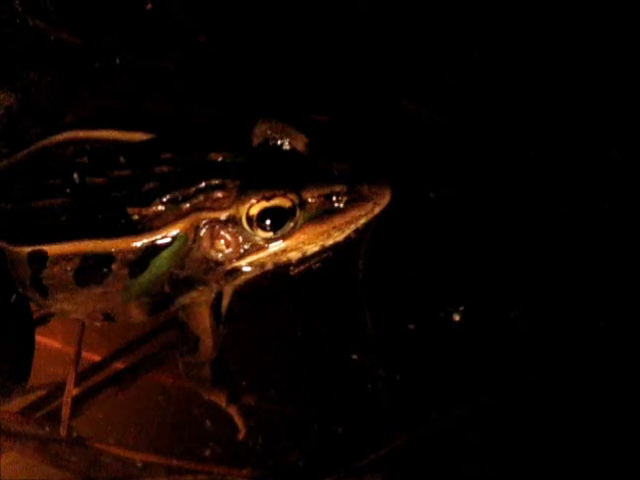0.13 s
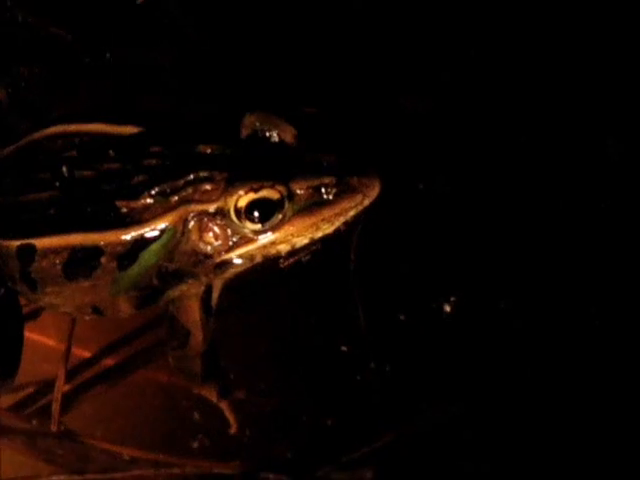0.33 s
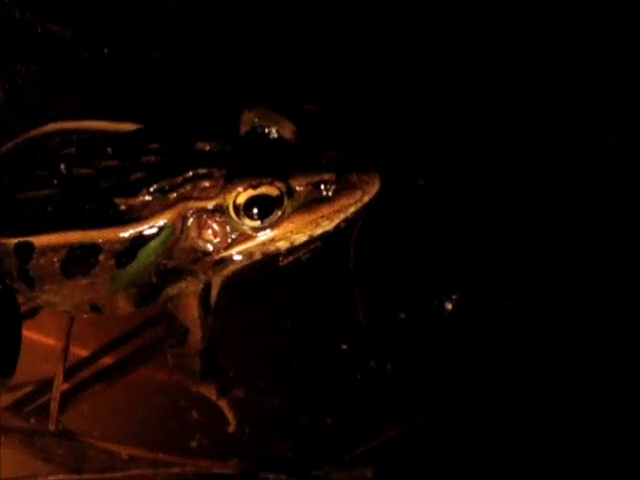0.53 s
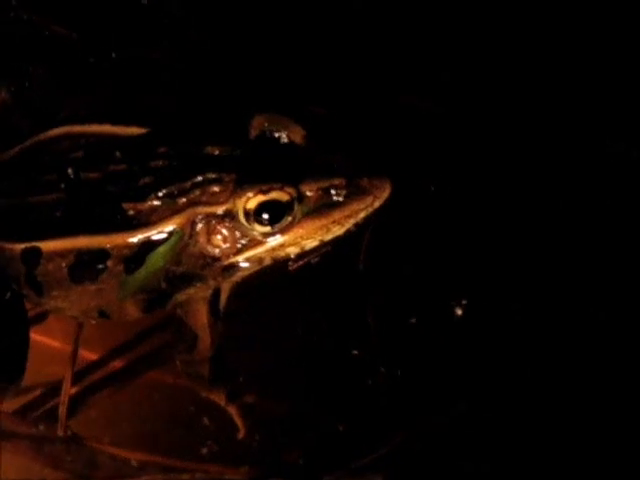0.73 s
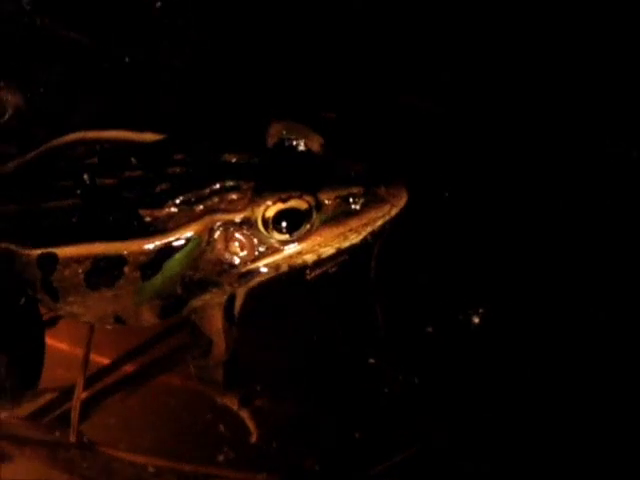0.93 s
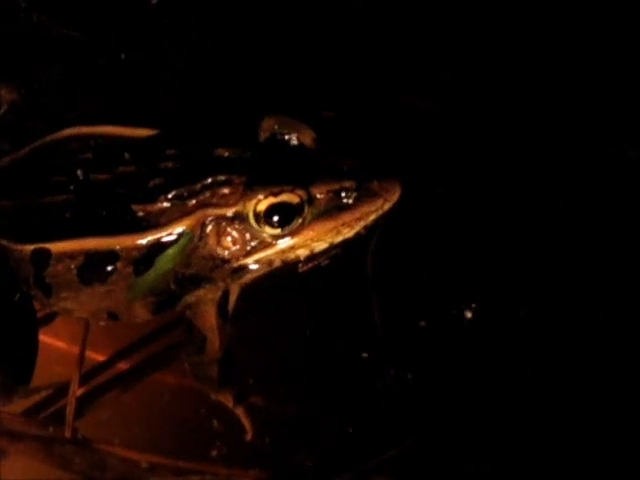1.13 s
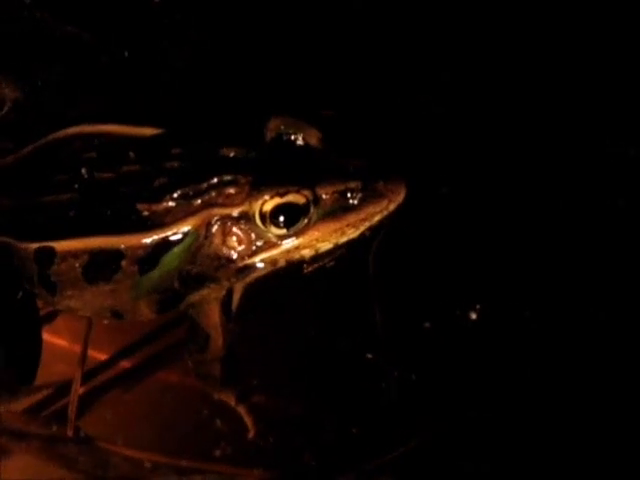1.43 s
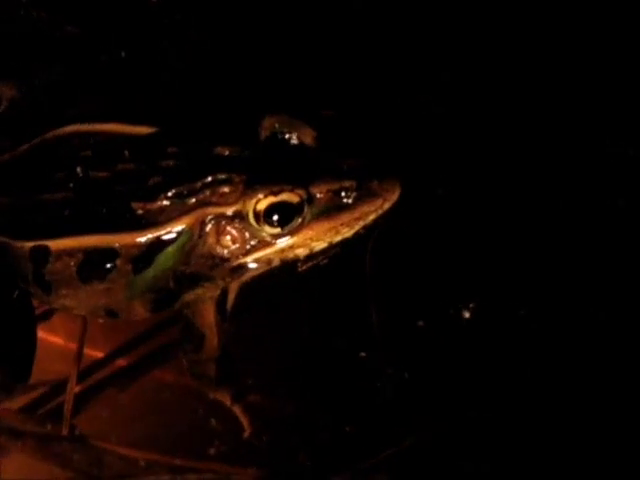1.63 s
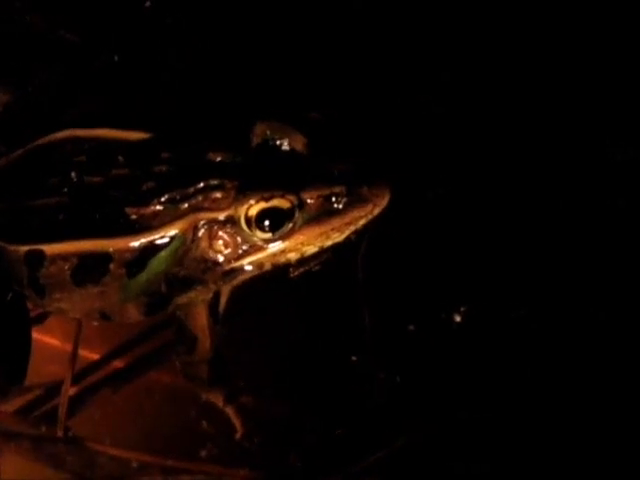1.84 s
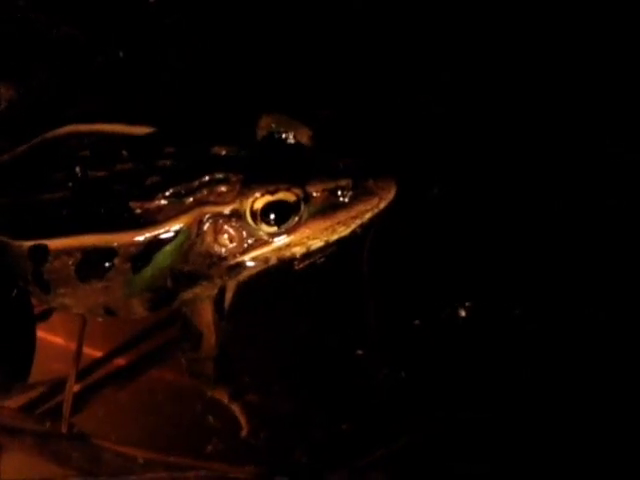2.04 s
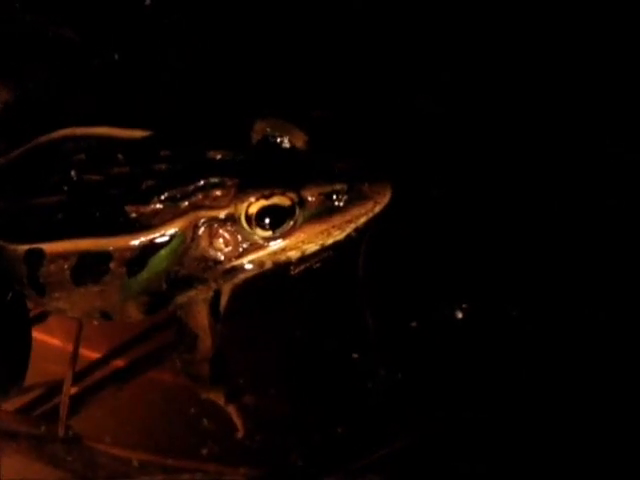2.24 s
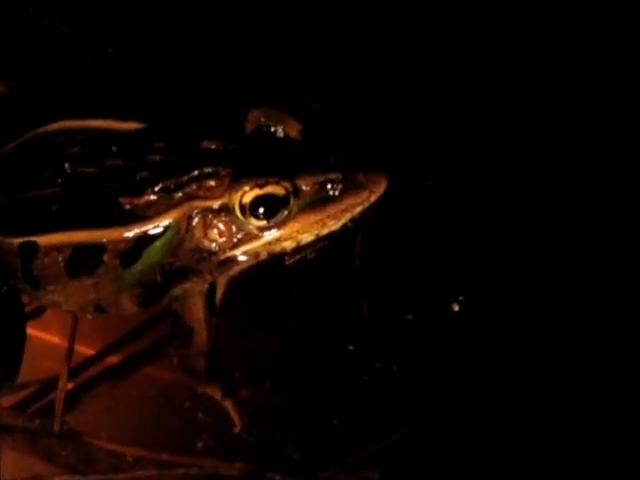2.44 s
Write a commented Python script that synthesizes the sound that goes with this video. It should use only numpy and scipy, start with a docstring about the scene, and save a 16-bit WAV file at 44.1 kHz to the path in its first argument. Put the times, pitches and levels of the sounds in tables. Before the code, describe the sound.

Frogs trill close by in fast, pulsing, overlapping trains at a night pond, with steady clucks, bursts of high ticks and short falling whistles; a loud pop and abrupt cut-in open it, distant chorus behind.

```python
"""Several frogs trill near 2 kHz at night by a pond, about fifty pulses a second, drifting in and out of step.
Lower trills, clucks near 3 kHz, and ticks and whistles near 5 kHz join in: all are short tones that swell and
die away. A far chorus of similar tones and a night hiss of shaped noise lie behind them.
A loud pop comes first; shortly after it the narrow-band, nearly mono scene cuts in abruptly with a click."""
import sys
import numpy as np
from scipy import signal
from scipy.fft import rfft, irfft, next_fast_len
from scipy.io import wavfile
from scipy.ndimage import uniform_filter1d, map_coordinates

SR = 44100
rng = np.random.default_rng(int(sys.argv[2]) if len(sys.argv) > 2 else 0)


def to_wav(s):
    """Save 16-bit WAV."""
    ch = np.atleast_2d(s).T  # columns
    pcm = np.round(np.clip(ch, -1, 1) * 32767)  # PCM
    wavfile.write(sys.argv[1], SR, pcm.astype(np.int16))


N = 113337
TIME_S = np.arange(N) / SR

BEAT_S = .02  # steady beat that each trill lags behind
PULSE_RISE_S, PULSE_T60_S, PULSE_FALL_HZ_PER_S = .005, .022, 9000
PULSE_SCATTER_S, PULSE_SCATTER_DB, PULSE_SCATTER_HZ = .0004, 1.2, 20
WHISTLE_FALL_HZ_PER_S = 7500  # whistles and far peeps


def amp(db):
    """Turn decibels into a plain multiplier."""
    return 10 ** (np.asarray(db) / 20)


def unit(x):
    """Scale a sound to an average (RMS) strength of one."""
    return x / np.sqrt(np.mean(x ** 2) + 1e-20)


def level_curve(table):
    """Join (t/s, level/dB) points with straight lines in dB, then turn them into multipliers."""
    return amp(np.interp(TIME_S, *np.transpose(table)))


def wobble(rate):
    """A smooth random curve through `rate` random points a second."""
    points = rng.standard_normal(int(N * rate / SR) + 4)
    return map_coordinates(points, [np.arange(N) * rate / SR])


def filtered(x, response):
    """Make each frequency of x stronger or weaker, as the response says."""
    size = next_fast_len(N + SR // 4)
    hz = np.fft.rfftfreq(size, 1 / SR)
    return irfft(rfft(x, size) * response(hz), size)[..., :N]


def notes(s, db, hz, envelope, fall_hz_per_s):
    """Short tones starting at times s, each gliding at a steady rate (0 holds the pitch) under its envelope."""
    t = np.arange(SR // 20) / SR
    s, db, hz = [np.asarray(v, float)[:, None] for v in (s, db, hz)]
    cycles = hz * t - fall_hz_per_s * t * t / 2 + rng.random(s.shape)
    wave = amp(db) * envelope(t) * np.sin(2 * np.pi * cycles)
    where = np.clip(np.round(s * SR).astype(int) + np.arange(len(t)), 0, N)
    return np.bincount(where.ravel(), wave.ravel(), N + 1)[:N]


def swell(rise_s, t60_s):
    """A smooth rise, then a rounded exponential fall."""
    def envelope(t):
        rise = np.sin(np.pi / 2 * t / rise_s) ** 3
        fall = 1 / np.cosh(np.log(1000) * np.abs(t - rise_s) / t60_s)
        return np.where(t < rise_s, rise, fall)
    return envelope


def pulses(s, db, hz, fall_hz_per_s):
    """Trill pulses peaking around times s, each a little different in time, level and pitch."""
    r = rng.standard_normal((len(s), 3))
    # start high enough to glide onto the wanted pitch at the peak
    start_hz = hz + PULSE_SCATTER_HZ * r[:, 0] + fall_hz_per_s * PULSE_RISE_S
    start_s = s - PULSE_RISE_S + PULSE_SCATTER_S * r[:, 1]
    level_db = db + PULSE_SCATTER_DB * r[:, 2]
    return notes(start_s, level_db, start_hz, swell(PULSE_RISE_S, PULSE_T60_S), fall_hz_per_s)


def trills(frogs, fall_hz_per_s):
    """Each frog pulses whenever its lagging beat comes round, so changing lags shift it out of step."""
    out = 0
    for frog in frogs:
        s, lag_ms, hz, db = np.transpose(frog)
        beats = (s - lag_ms / 1000) / BEAT_S
        whole_beats = np.arange(np.ceil(beats[0]), beats[-1])
        times = np.interp(whole_beats, beats, s)
        out = out + pulses(times, np.interp(times, s, db), np.interp(times, s, hz), fall_hz_per_s)
    return out


def knocks(events, ratios, parts, fall_hz_per_s, rasp_db_per_hz=0):
    """Each call is a stack of short falling tones at set ratios of its pitch, each a little scattered."""
    s, db, hz = np.transpose(events)
    rasp_db = rasp_db_per_hz * (hz - 3200)  # no change at 3200 Hz
    out = 0
    for ratio, (delay_s, part_db, rise_s, t60_s, spread_hz) in zip(ratios, parts):
        is_outer = abs(ratio - 1) > .1
        level_db = db + part_db + rasp_db * is_outer + rng.normal(0, 1.2, len(s))
        pitch_hz = hz * ratio + spread_hz * rng.standard_normal(len(s))
        out = out + notes(s + delay_s, level_db, pitch_hz, swell(rise_s, t60_s), fall_hz_per_s)
    return out


def scattered(per_s, hz, spread_hz, db, spread_db, count=120):
    """Random (t/s, level/dB, f/Hz) events at a loosely regular rate."""
    r = rng.standard_normal((count, 3))
    s = (np.arange(count) + .3 * r[:, 0]) / per_s
    return np.transpose([s, db + spread_db * r[:, 1], hz + spread_hz * r[:, 2]])


POP_S, POP_HZ, POP_LENGTH_S = .05945, 5520, .000305
POP_THUMP_DB, POP_RING_DB = (-15.5, -13), (-5, -15)  # left, right
RATTLE_DB, RATTLE_T60_S, RATTLE_S = -32, .06, .023


def pop():
    """A thump with a very short bright burst, mostly on the left, and a faint noisy rattle from its start."""
    t = np.clip(TIME_S - POP_S, 0, 1)
    window = np.sqrt(np.abs(np.sin(np.pi * np.clip(t / POP_LENGTH_S, 0, 1)))) * (t < POP_LENGTH_S)
    ring = -np.cos(2 * np.pi * POP_HZ * (t - POP_LENGTH_S * .62))
    burst = amp(POP_THUMP_DB)[:, None] + amp(POP_RING_DB)[:, None] * ring
    fading = amp(RATTLE_DB - 60 * t / RATTLE_T60_S) * (t > 0) * (t < RATTLE_S)
    return window * burst + fading * rng.standard_normal(N)


# close trilling frogs, one list per frog: t/s, lag behind the steady beat/ms, f/Hz, level/dB
MAIN_TRILLS = [
    [(.14, 9.74, 2123, -13), (.3, 9.46, 2113, -10.5), (.45, 6.57, 2092, -14.5), (.55, 4.78, 2104, -17.5),
     (.66, 5.07, 2098, -11.5), (.85, 5.8, 2095, -13), (1.0, 7.48, 2090, -13), (1.2, 8.94, 2086, -10.5),
     (1.33, 9.84, 2087, -12.5), (1.45, 10.93, 2087, -13), (1.7, 13, 2078, -11.5), (1.9, 16.7, 2077, -14.5),
     (2.05, 20.4, 2094, -12.5), (2.13, 23.6, 2050, -12.5), (2.22, 34, 2082, -15.5), (2.27, 39.3, 2060, -16)],
    [(.14, 3, 1910, -17), (.25, 13.1, 1815, -23.5), (.33, 22.6, 1848, -17.5), (.42, 34.3, 1865, -29),
     (.52, 43, 1843, -24)],
    [(.14, 0.5, 2019, -16), (.3, 1, 1966, -18.5), (.5, 2, 1962, -17.5)],
    [(.68, 16.4, 2020, -29), (.88, 18, 2027, -15.5), (1.0, 19.8, 2040, -12), (1.2, 21, 2040, -22.5),
     (1.3, 22.3, 1950, -21.5)],
    [(1.5, -0.5, 2030, -24), (1.62, 3.5, 2030, -18), (1.72, 2.5, 2020, -17), (1.92, 1.5, 1992, -27),
     (2.0, 2.5, 1977, -17.5)],
    [(2.2, -1, 2040, -18), (2.35, 1, 2040, -14.5), (2.45, 5, 2030, -12.5), (2.58, 7.5, 2030, -11.5)],
]


def main_trills():
    """The close frogs near 2 kHz: trains of pulses that each glide down in pitch."""
    return trills(MAIN_TRILLS, PULSE_FALL_HZ_PER_S)


# how loud the far trills are together: t/s, level/dB
FAR_TRILL_LEVEL = [(.14, -23), (.45, -27), (.55, -37), (.75, -27.5), (1.0, -22), (1.35, -35), (1.7, -18.5),
                   (2.0, -26), (2.3, -23), (2.57, -31.5)]


def far_trills(count=8):
    """Several frogs out of step, each a pulse train with its own rate, pitch and random swells."""
    out = 0
    for rate, phase, pitch in rng.random((count, 3)):
        per_s = 45 + 8 * rate
        times = (np.arange(140) + phase) / per_s
        hz = 2050 + 120 * (2 * pitch - 1)
        train = pulses(times, 0 * times, hz + 0 * times, PULSE_FALL_HZ_PER_S)
        swells = amp(3.5 * wobble(3))  # dB, three random points a second
        out = out + swells * train
    return unit(out) * level_curve(FAR_TRILL_LEVEL)


def far_low():
    """A ragged skirt of lower voices under the main trill: falling pulses at loosely regular times."""
    s, db, hz = np.transpose(scattered(per_s=170, hz=1680, spread_hz=140, db=-36, spread_db=3, count=500))
    return pulses(s, db, hz, PULSE_FALL_HZ_PER_S)


# tone colour of the night noise, only relative levels matter: f/Hz, level per Hz/dB
NIGHT_COLOUR = [(20, -32), (60, -34), (870, -37.5), (1350, -31.5), (1700, -25), (2050, -13), (2300, -22),
                (2500, -32), (3070, -30), (3900, -37), (4400, -36.5), (5100, -31.5), (5450, -43.5),
                (5900, -62.5), (6600, -85)]
# how loud the night noise is: t/s, level/dB
NIGHT_LEVEL = [(.14, -37), (.4, -37), (.55, -39), (.75, -36), (1.3, -37), (1.7, -35), (2.1, -36),
               (2.57, -33)]
PATCHY_DB = 3


def night():
    """Blurred distant callers and hiss: noise made uneven in time and pitch, then coloured."""
    grid = signal.stft(rng.standard_normal(N), nperseg=256)[2]
    patches = uniform_filter1d(rng.standard_normal(grid.shape), 3, 0)  # smooth across pitch
    patches = uniform_filter1d(patches, 5, 1)  # smooth across time
    noise = signal.istft(grid * amp(PATCHY_DB * unit(patches)), nperseg=256)[1][:N]
    f, db = np.transpose(NIGHT_COLOUR)
    coloured = filtered(noise, lambda hz: amp(np.interp(np.log(hz + 1), np.log(f), db)))
    return level_curve(NIGHT_LEVEL) * unit(coloured)


# near clucks: t/s, level/dB, f/Hz
NEAR_CLUCKS = [(0.1693, -23.5, 3030), (0.2361, -20, 3084), (0.308, -20.5, 3170), (0.3858, -20.5, 3180),
               (0.4699, -18.5, 3310), (0.5615, -27, 3380), (0.6417, -26, 3376), (0.7256, -35, 2800),
               (0.7731, -24.5, 2750), (0.832, -24.5, 2914), (0.899, -19, 2950), (0.9726, -21, 3000),
               (1.0513, -20, 3005), (1.1378, -19, 3050), (1.2, -27, 3010), (1.228, -22, 3020),
               (1.2496, -28, 3040), (1.3072, -29, 2710), (1.3217, -22, 3110), (1.3671, -21.5, 3020),
               (1.4072, -27, 3200), (1.4302, -23, 3130), (1.497, -24.5, 3040), (1.5658, -20, 3350),
               (1.6357, -24, 3330), (1.7112, -27.5, 3520), (1.7801, -28.5, 3376), (1.871, -28, 3050),
               (1.922, -30.5, 3030), (1.9802, -26.5, 3080), (2.0462, -20.5, 2990), (2.1174, -19.5, 3347),
               (2.1961, -15.5, 3270), (2.2795, -15, 3287), (2.309, -33, 3287), (2.364, -20, 3346),
               (2.4447, -18.5, 3374)]
# pitch of each part of a cluck, as a multiple of the cluck's f
CLUCK_RATIOS = [1.015, .91, 1.13, .82, 1.25, 1.0]
# the same parts: delay t/s, level/dB, rise t/s, 60 dB fall t/s, pitch scatter f/Hz
CLUCK_PARTS = [(0, -2.5, .0022, .022, 15), (.001, -9, .002, .018, 50), (0, -10, .0012, .013, 90),
               (0, -14, .0012, .013, 90), (0, -22, .0007, .007, 250), (.0105, -13, 0.0034, .018, 30)]


def clucks():
    """Near and far clucks share one stack of falling tones; higher clucks have stronger outer tones."""
    far = scattered(per_s=22, hz=3050, spread_hz=200, db=-40, spread_db=3)
    return sum(knocks(events, CLUCK_RATIOS, CLUCK_PARTS, fall_hz_per_s=8000, rasp_db_per_hz=.022)
               for events in (NEAR_CLUCKS, far))


# the single part of a far peep: delay t/s, level/dB, rise t/s, 60 dB fall t/s, pitch scatter f/Hz
PEEP_PARTS = [(0, -.5, .004, .04, 20)]


def far_peeps():
    """Soft falling tones near 5 kHz, rising too gently to click."""
    peeps = scattered(per_s=38, hz=5170, spread_hz=90, db=-44, spread_db=2.5)
    return knocks(peeps, [1], PEEP_PARTS, WHISTLE_FALL_HZ_PER_S)


# near ticks: t/s, level/dB, f/Hz
TICKS = [(0.2666, -33, 4850), (0.3002, -33.5, 4790), (0.3303, -36.5, 4670), (0.3572, -33.5, 4800),
         (0.493, -16.5, 4690), (0.5157, -29.5, 5230), (0.5257, -16.5, 4870), (0.5522, -19.5, 4530),
         (0.564, -27.5, 4770), (0.5764, -23, 4550), (0.5812, -22.5, 4810), (0.5954, -23, 4650),
         (0.601, -23.5, 4570), (0.6088, -35, 4960), (0.622, -24.5, 4700), (0.6377, -30, 4960),
         (0.7534, -37.5, 4970), (0.7781, -40, 4830), (1.0033, -39.5, 4710), (1.4138, -19, 4820),
         (1.4485, -22.5, 4750), (1.4794, -22.5, 4790), (1.5127, -25.5, 4690), (1.5438, -26.5, 4730),
         (1.5915, -35.5, 4630), (1.919, -15.5, 4930), (1.956, -23, 4920), (1.9614, -21, 4760),
         (1.9847, -25, 4900), (1.9889, -22, 4840), (2.0135, -20, 4520), (2.0423, -28, 4960),
         (2.1026, -34.5, 5000), (2.4798, -32, 4840), (2.5132, -32.5, 4780), (2.5404, -28.5, 4720)]
# pitch of each part of a tick, as a multiple of the tick's f
TICK_RATIOS = [1.01, .94, 1.06, 1.25]
# the same parts: delay t/s, level/dB, rise t/s, 60 dB fall t/s, pitch scatter f/Hz
TICK_PARTS = [(0, -.5, .001, .015, 15), (0, -9, .001, .01, 50), (.003, -10, 0.0018, .012, 50),
              (0, -26, .0004, .004, 200)]


def ticks():
    """Small frogs tick: stacks of very short tones that fall fast in pitch."""
    return knocks(TICKS, TICK_RATIOS, TICK_PARTS, fall_hz_per_s=13000)


# falling whistles: start t/s, length t/s, start f/Hz, level/dB
WHISTLES = [(.399, 0.037, 5090, -24), (.419, 0.026, 5085, -29), (.42, 0.031, 5460, -35.5),
            (1.308, 0.031, 5135, -30), (1.807, .035, 5070, -25.5), (1.823, 0.031, 5430, -33)]


def whistles():
    """Small frogs whistle: pure falling tones with quick edges."""
    s, length_s, hz, db = np.transpose(WHISTLES)

    def edges(t):
        nearest_end_s = np.minimum(t, length_s[:, None] - t)
        return np.clip(nearest_end_s / .0025, 0, 1) ** 2
    return notes(s, db, hz, edges, WHISTLE_FALL_HZ_PER_S)


# lone low pulses: t/s (half a rise before the peak), level/dB, f/Hz
LONE_PULSES = [(1.0852, -24.5, 1605), (1.4162, -26, 1550), (1.4688, -23, 1640)]


def lone_pulses():
    """A few single low pulses that hold their pitch."""
    s, db, hz = np.transpose(LONE_PULSES)
    return pulses(s + PULSE_RISE_S / 2, db, hz, fall_hz_per_s=0)


# lower-voiced trills, one list per trill: t/s, lag behind the steady beat/ms, f/Hz, level/dB
LOW_TRILLS = [
    [(1.15, 15, 1630, -19), (1.22, 20, 1675, -19.5), (1.31, 28, 1700, -22), (1.405, 37, 1767, -24)],
    [(1.49, 17, 1763, -25), (1.59, 27, 1770, -22), (1.68, 42, 1720, -22), (1.765, 57, 1748, -22)],
]


def low_trills():
    """Lower voices trill in pulses that each hold their pitch."""
    return trills(LOW_TRILLS, fall_hz_per_s=0)


POND_T60_S, POND_DB = .22, -18


def pond(x):
    """Scattered echoes off water and banks: the sound is smeared by a fading burst of noise."""
    t = np.arange(SR // 4) / SR
    tail = rng.standard_normal(len(t)) * amp(-60 * t / POND_T60_S) * (t > .003)
    echoes = signal.fftconvolve(x, tail / np.linalg.norm(tail))[:N]
    return x + amp(POND_DB) * echoes


def scene():
    """Trills, clucks, peeps, ticks and whistles, near and far, with pond echoes, over far trills and night noise."""
    callers = main_trills() + clucks() + far_peeps() + ticks() + whistles() + lone_pulses() + low_trills()
    mono = pond(callers) + far_trills() + far_low() + night()
    return np.array([mono, mono])


LIMIT, LIMIT_KNEE = .42, 4  # ceiling as amplitude, sharpness of the bend
BAND_HZ, BAND_ORDER, TOP_HZ = 5720, 8, 16844
HISS_DB, OFFSET = -87, .0053
CUT_IN_S, CUT_IN_CLICK_DB = .1468, -16


def record(dry):
    """Soft limiter, narrow band, faint hiss and a small offset, cutting in with a click; left one sample late."""
    size = np.abs(signal.hilbert(dry, next_fast_len(N)))[:, :N]
    limited = dry / (1 + (size / LIMIT) ** LIMIT_KNEE) ** (1 / LIMIT_KNEE)
    narrow = filtered(limited, lambda hz: 1 / (1 + (hz / BAND_HZ) ** BAND_ORDER)) + OFFSET
    narrow = narrow + amp(HISS_DB) * rng.standard_normal(N)
    since = np.arange(N) - round(CUT_IN_S * SR)
    narrow = narrow * (since >= 0) + amp(CUT_IN_CLICK_DB) * (since == 0)
    late = np.array([np.pad(narrow[0], (1, 0))[:N], narrow[1]])
    # the pop skips the narrow band; everything fades out over the last 600 Hz below TOP_HZ
    return filtered(late + pop(), lambda hz: np.clip((TOP_HZ - hz) / 600, 0, 1))


dry = scene()
out = record(dry)
to_wav(out)
```